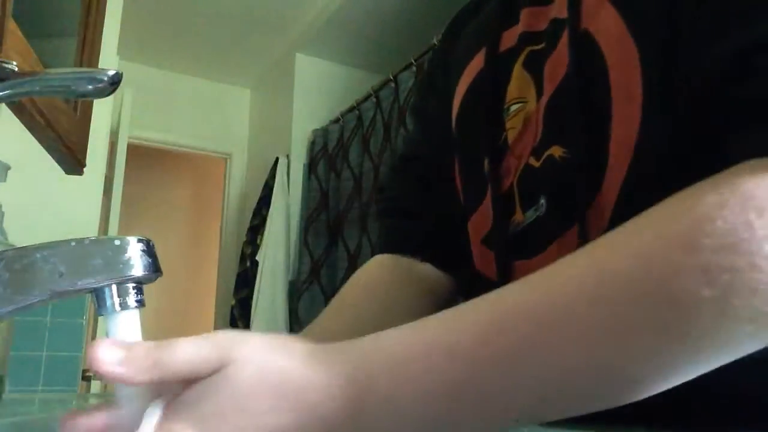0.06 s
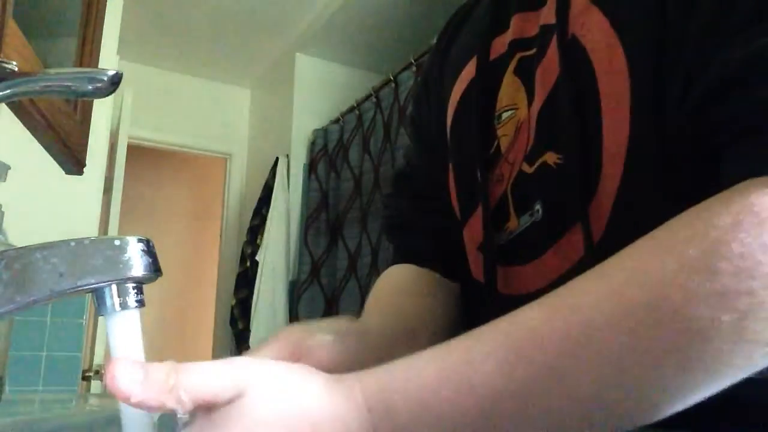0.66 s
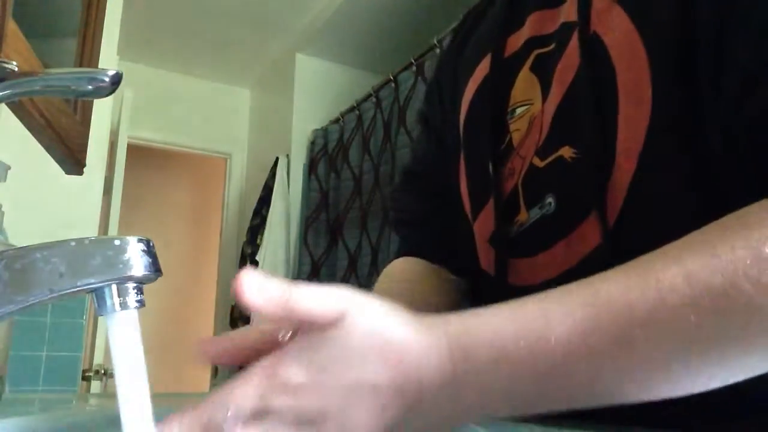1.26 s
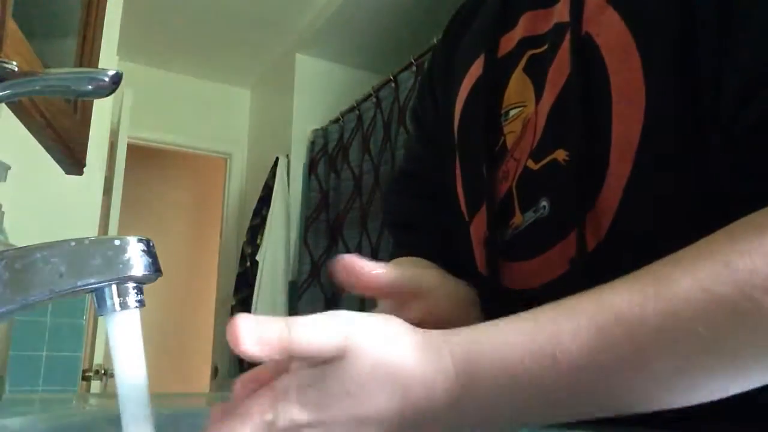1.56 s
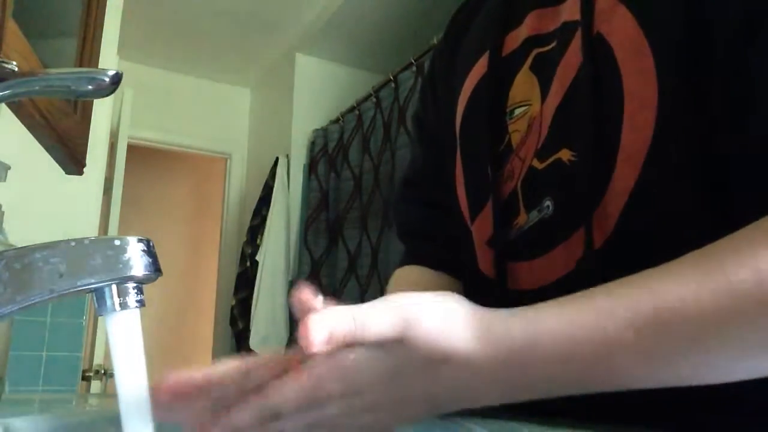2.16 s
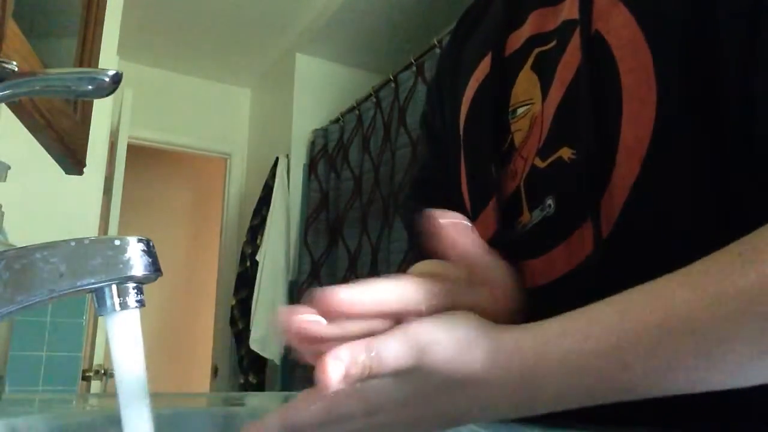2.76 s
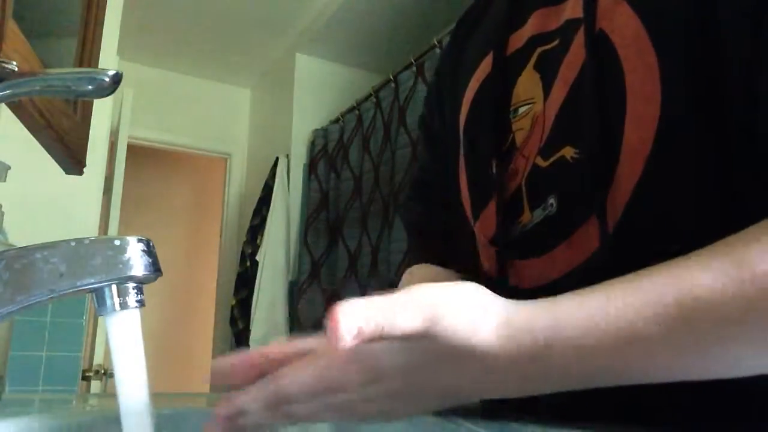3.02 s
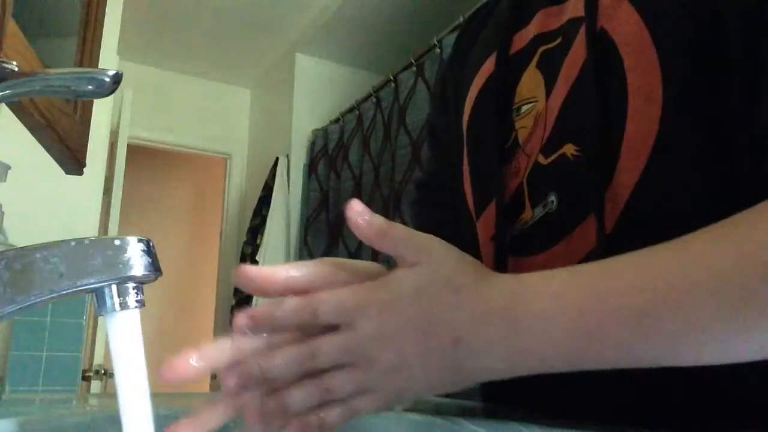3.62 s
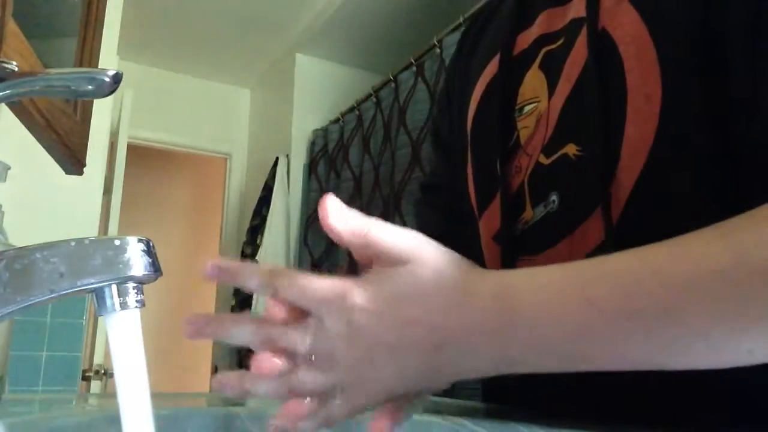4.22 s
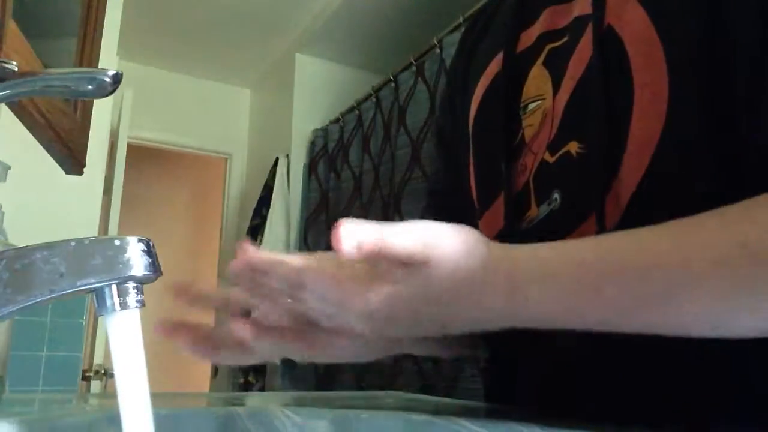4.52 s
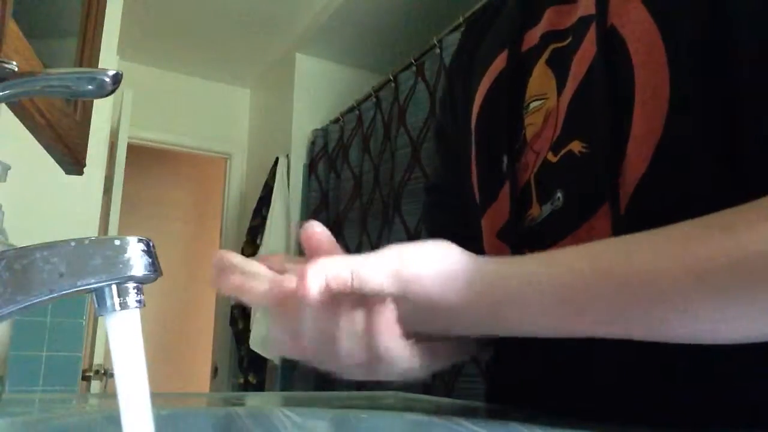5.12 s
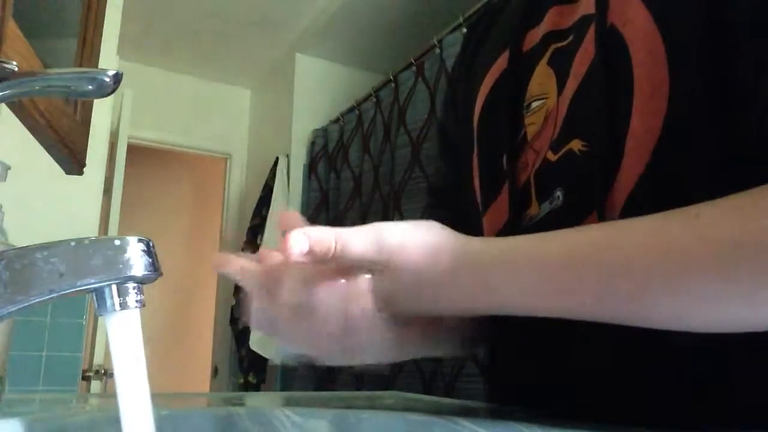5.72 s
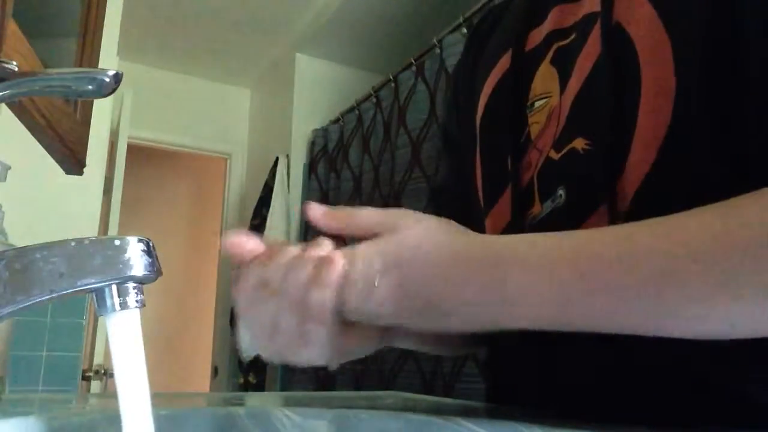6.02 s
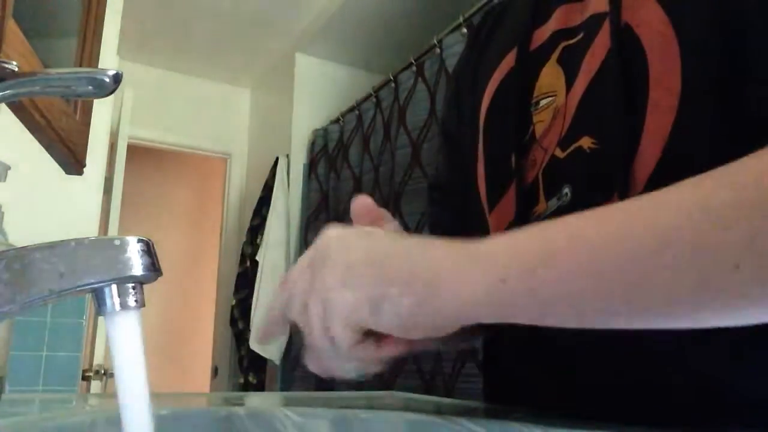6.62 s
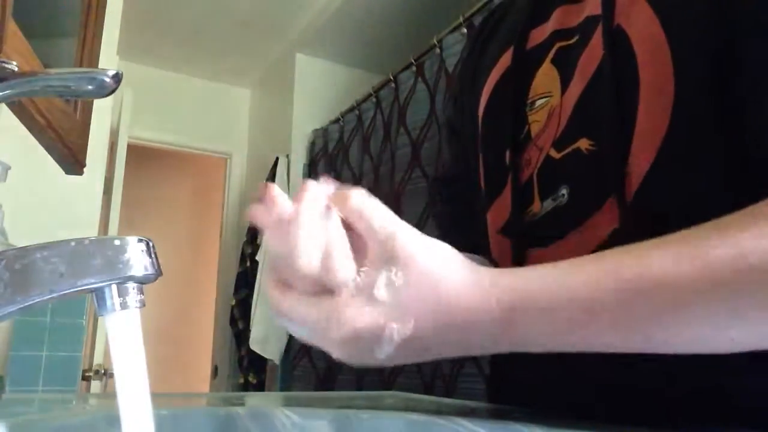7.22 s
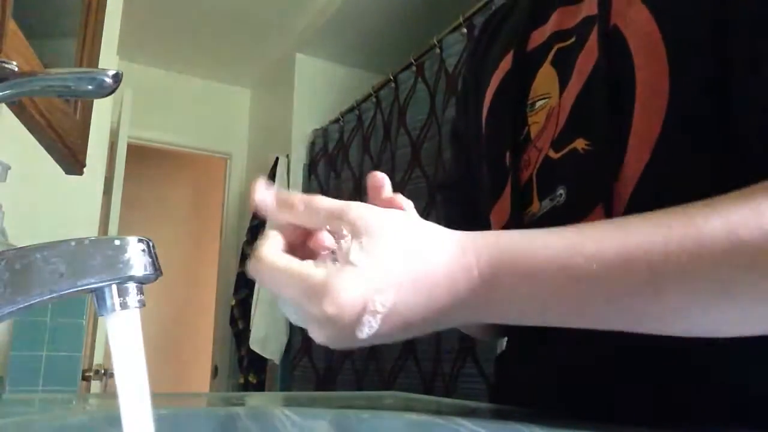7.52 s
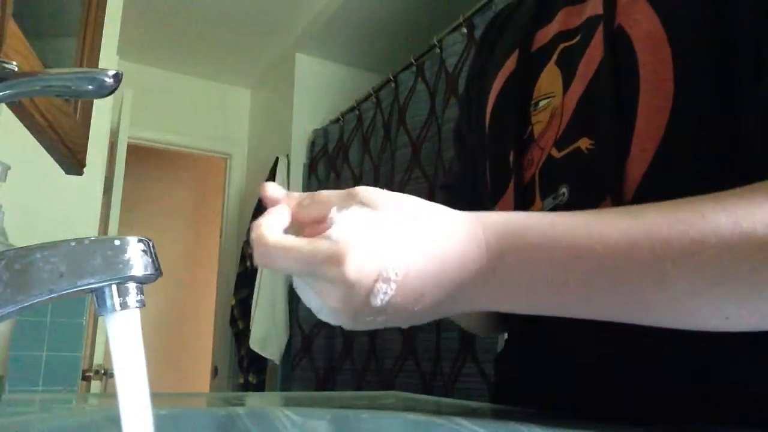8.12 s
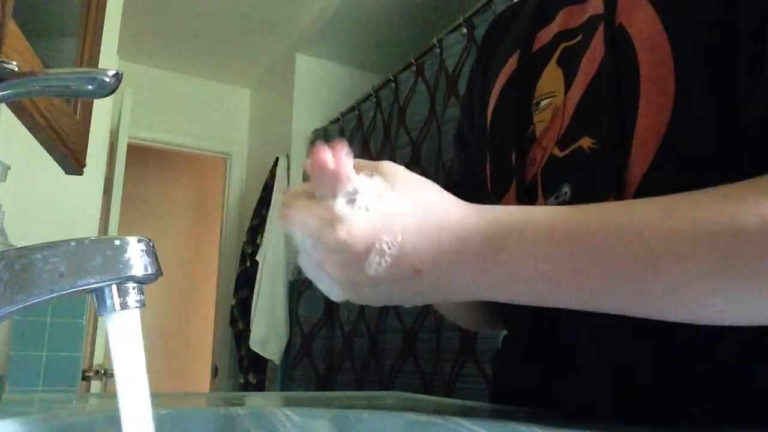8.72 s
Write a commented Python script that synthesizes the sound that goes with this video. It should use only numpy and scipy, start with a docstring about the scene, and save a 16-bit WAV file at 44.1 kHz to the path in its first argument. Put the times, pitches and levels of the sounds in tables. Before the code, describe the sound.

A tap runs steadily into a sink while hands splash briefly, then rub together with soft, soapy squelches.

```python
"""Washing hands under an aerated tap

The tap runs steadily into a basin in a small bathroom, close up and mono. Bursting bubbles make
the jet hiss; its water drums on the basin floor and surges into the pool while the drain gurgles.
At first hands splash through the jet, then they rub soap beside it: soft wet strokes, a growing
crackle of lather and a few squelches of trapped air."""
import sys
import numpy as np
from scipy import signal
from scipy.fft import rfft, irfft, next_fast_len
from scipy.io import wavfile
from scipy.ndimage import map_coordinates

SR = 44100
rng = np.random.default_rng(int(sys.argv[2]) if len(sys.argv) > 2 else 0)


def transcribe(signal):
    """Save signal, clipped to [-1, 1], as a 16-bit WAV file at the path in sys.argv[1]."""
    frames = np.atleast_2d(signal).T
    limited = np.clip(frames, -1, 1)
    pcm = np.round(limited * 32767).astype(np.int16)
    wavfile.write(sys.argv[1], SR, pcm)


N = 395577
TIME = np.arange(N) / SR
FFT_SIZE = next_fast_len(N + SR // 2)
HZ = np.maximum(np.arange(FFT_SIZE // 2 + 1) * SR / FFT_SIZE, 1)


def from_db(db):
    """Decibels to gain."""
    return 10 ** (np.asarray(db) / 20)


def rms_one(x):
    """Scale to unit power."""
    return x / np.sqrt(np.mean(x ** 2) + 1e-20)


def colour(points):
    """An EQ curve through (Hz, dB) points, as a gain at every frequency."""
    hz, db = np.transpose(points)
    return from_db(np.interp(np.log(HZ), np.log(hz), db))


def shaped(x, gain):
    """Play a sound through an EQ curve."""
    return irfft(rfft(x, FFT_SIZE) * gain, FFT_SIZE)[:N]


def drift(turns_per_s):
    """A random wander of unit power."""
    knots = rng.standard_normal(4096)
    return rms_one(np.interp(TIME * turns_per_s, np.arange(len(knots)), knots))


def impacts(per_s, spread_db):
    """Random clicks: many small ones, a few large."""
    sizes = from_db(spread_db * np.minimum(rng.exponential(1, N), 4)) * rng.choice([-1, 1], N)
    return sizes * (rng.random(N) < per_s / SR)


def ring(clicks, hz, t60):
    """Each click sets a sine ringing, dying by 60 dB in t60 seconds."""
    decay, step = from_db(-60 / (t60 * SR)), 2 * np.pi * hz / SR
    return signal.lfilter([0, np.sin(step)], [1, -2 * decay * np.cos(step), decay ** 2], clicks + 1e-18)


def hollow(hz, bursts_per_s, width_hz):
    """Bursting bubbles ring a pocket of air at a steady or moving pitch."""
    carrier = np.exp(2j * np.pi * np.cumsum(np.broadcast_to(hz, N)) / SR)
    damping = signal.butter(2, width_hz / 2, fs=SR, output="sos")
    bursts = impacts(bursts_per_s, spread_db=2.5)
    # shift down, low-pass, shift back: a band that follows the pitch
    return rms_one((signal.sosfilt(damping, bursts / carrier + 1e-18) * carrier).real)


def swells(starts, lengths, levels_db, attack_s, release_s):
    """Gain of a series of attack-hold-release swells; where they overlap the stronger one counts."""
    gain = np.zeros(N)
    for start, length, db in zip(starts, lengths, levels_db):
        rise = (TIME - start) / attack_s
        fall = 1 - (TIME - start - length) / release_s
        gain = np.maximum(gain, from_db(db) * np.clip(np.minimum(rise, fall), 0, 1))
    return gain


def held(starts, values):
    """Each value lasts from its start to the next."""
    return values[np.maximum(np.searchsorted(starts, TIME) - 1, 0)]


# Resonances and notches of basin, drain and spout. Each row: centre in Hz, width in Hz, lift in dB.
BASIN_MODES = [(157, 10.4, 6.5), (225, 17, 5.5), (355, 17.5, 6), (413, 15, 4), (545.6, 20, 7),
               (706, 51, 9.5), (970, 83, 4), (1292, 40, 3.5), (1417, 50, -5), (1482, 22, 6.5),
               (1800, 440, 4), (1880, 26, 2), (2155, 130, -5), (2206, 23, 7), (2350, 206, 4.5),
               (2844, 74, 4), (3350, 270, 4), (4920, 300, 1.5), (5570, 200, 1.6), (6670, 170, 3.5),
               (7120, 150, 2), (7920, 190, 3.5), (11900, 400, 2.5), (12300, 630, -6), (13542, 482, 2),
               (14203, 306, -1), (15100, 300, 5)]
def basin():
    """The bowl's resonances as an EQ curve."""
    return from_db(sum(db / (1 + (2 * (HZ - hz) / width) ** 2) for hz, width, db in BASIN_MODES))


def bathroom(x, t60, wet_db):
    """Direct sound and a short, dense tail from the tiles."""
    t = TIME[:SR // 2]
    tail = rng.standard_normal(len(t)) * from_db(-60 * t / t60) * (t > 0.004)
    return x + from_db(wet_db) * signal.fftconvolve(x, tail / np.linalg.norm(tail))[:N]


# The bright tone of the foaming jet. Each row: frequency in Hz, gain in dB.
FIZZ_EQ = [(300, -20.5), (850, -22.5), (1000, -13), (1800, -10.5), (2100, -9), (2650, -11), (3900, 0),
           (5300, 0.5), (6200, -6), (7500, -0.5), (9300, -4.5), (9700, -6), (12500, -7), (15200, -5.5)]
def jet(level_db, bursts_per_s, flutter_db, patchy_db):
    """Countless tiny bubbles burst; each size of bubble comes in clumps while the whole jet flutters."""
    bursts = impacts(bursts_per_s, spread_db=2.5)
    edges_hz = np.r_[0, np.geomspace(800, 15290, 12)[:-1], SR]
    fizz = np.zeros(N)
    for low, high in zip(edges_hz, edges_hz[1:]):
        fizz += shaped(bursts, (HZ >= low) & (HZ < high)) * from_db(patchy_db * drift(160))
    low_cut = 1 / np.sqrt(1 + (300 / HZ) ** 4)
    fizz = shaped(fizz, colour(FIZZ_EQ) * basin() * low_cut)
    fizz *= from_db(flutter_db * drift(300))
    dip_db = -0.7 * np.clip(1 - TIME, 0, 1)  # hands break the jet for the first second
    return rms_one(bathroom(fizz, t60=0.2, wet_db=-14.5)) * from_db(level_db + dip_db)


def off_the_hands(x, lag_s, sway, echo_db):
    """The moving hands throw back a faint, very early echo, so the hiss shifts a little in colour."""
    lag = lag_s * np.exp(sway * drift(2.7))
    return x + from_db(echo_db) * map_coordinates(x, [(TIME - lag) * SR], order=3)


# The low thrum of the basin floor. Each row: frequency in Hz, gain in dB.
FLOOR_EQ = [(25, -31), (35, -32), (50, -15.5), (70, -13.5), (100, 0), (230, -2.0), (400, -4.5), (500, -15),
            (900, -15)]
def drumming(blows_per_s, lump_db, top_hz):
    """Lumps of water beat on the basin floor and shake its low modes."""
    blows = impacts(blows_per_s, spread_db=2.0) * from_db(lump_db * drift(25))
    high_cut = 1 / np.sqrt(1 + (HZ / top_hz) ** 8)
    return rms_one(shaped(blows, colour(FLOOR_EQ) * basin() * high_cut))


# The tone of the splashes. Each row: frequency in Hz, gain in dB.
SPLASH_EQ = [(200, -20), (450, -1.5), (1000, 3), (1800, 3), (2600, 0), (3350, 12), (5000, -8), (12000, -22)]
# Water breaks over the hands. Each row: start in seconds, length in seconds, level in dB.
HAND_RINSES = [(0, .3, -54), (0.288, 0.25, -44), (1.08, 0.15, -46)]
def splashing(ring_cycles):
    """Drops land and trap ringing bubbles: thickly in a rinse, thinly from the growing lather."""
    rinse = swells(*np.transpose(HAND_RINSES), attack_s=0.04, release_s=0.14)
    lather = from_db(-48 - 2 * np.maximum(8.4 - TIME, 0))  # grows until the hands are covered at 8.4 s
    drops_per_s = np.where(rinse > lather, 400, 160)
    drops = impacts(drops_per_s, spread_db=2.0) / np.sqrt(drops_per_s)
    pitches_hz = np.geomspace(400, 9000, 36)
    pick = rng.integers(0, len(pitches_hz), N)
    bubbles = sum(hz * ring(drops * (pick == k), hz, ring_cycles / hz) for k, hz in enumerate(pitches_hz))
    return rms_one(shaped(bubbles, colour(SPLASH_EQ))) * np.hypot(rinse, lather)


# The gurgle's rise and fall. Each row: time in seconds, level in dB.
DRAIN_LEVELS = [(.2, -46.5), (.45, -53.5), (2.6, -48.5), (4.4, -50), (5.9, -53), (6.8, -54), (7.3, -47.5),
                (8, -55), (8.97, -50)]
def drain():
    """The drain's throat gurgles on one pitch."""
    level_db = np.interp(TIME, *np.transpose(DRAIN_LEVELS))
    return hollow(hz=1782, bursts_per_s=2000, width_hz=58) * from_db(level_db)


# The jet digs into the pool. Each row: start in seconds, length in seconds, cavity level in dB,
# cavity pitch in Hz, floor thrum level in dB.
POOL_SURGES = [(0.246, 0.3, -51, 244, -65), (0.776, .16, -42.5, 224, -46.5), (.97, 0.12, -52, 233, -45),
               (1.38, 0.19, -42, 240, -47.5), (1.754, 0.53, -46.5, 222, -54), (2.28, 0.7, -48, 170, -52),
               (3.024, 0.42, -49, 229, -49.5), (3.496, 0.14, -49, 158, -50.5), (4.7, .24, -55, 225, -52),
               (4.997, 0.38, -53, 174, -51), (5.548, .23, -63, 165, -49), (6.095, 0.4, -54, 167, -49.5),
               (8.08, 0.27, -50, 217, -49), (8.497, .47, -48.5, 221, -48.5)]
def surges(attack_s, release_s):
    """Each surge digs a booming cavity in the pooled water and thumps the floor under it."""
    starts, lengths, cavity_db, cavity_hz, thrum_db = np.transpose(POOL_SURGES)
    cavity = hollow(held(starts, cavity_hz), bursts_per_s=3000, width_hz=59)
    cavity *= swells(starts, lengths, cavity_db, attack_s, release_s)
    thrum = drumming(blows_per_s=2000, lump_db=1.5, top_hz=180)
    thrum *= swells(starts, lengths, thrum_db, attack_s, release_s)
    return cavity + thrum


# Air pockets pop between wet hands. Each row: start in seconds, pop level in dB, pitch in Hz,
# time to fade by 60 dB in seconds, splat level in dB.
AIR_POCKETS = [(.412, -44, 1050, .04, -41), (.517, -45, 880, 0.045, -38), (.622, -33, 1880, .07, -50),
               (.642, -29.5, 1910, 0.028, -31), (.646, -33, 1575, 0.07, -40),
               (1.164, -33, 1800, 0.038, -45), (2.566, -30, 1740, 0.045, -43), (2.844, -32, 2150, .03, -44),
               (3.238, -33, 2750, .008, -28), (5.439, -31, 1780, .045, -45), (6.422, -38, 1250, .03, -44),
               (6.424, -33, 2220, .04, -38), (7.359, -24, 2880, 0.021, -44)]
def squelches(rise_per_s, attack_s, splat_t60):
    """The water film splats, and the air pocket rings briefly, rising a little in pitch as it opens."""
    out = np.zeros(N)
    for start_s, pop_db, hz, t60, splat_db in AIR_POCKETS:
        start = round(start_s * SR)
        t = TIME[:min(SR // 5, N - start)]
        pop = np.sin(2 * np.pi * hz * (t + rise_per_s * t ** 2 / 2)) * from_db(pop_db - 60 * t / t60)
        film_band = signal.butter(2, [hz * 0.69, hz * 1.45], "band", fs=SR, output="sos")
        splat = rms_one(signal.sosfilt(film_band, rng.standard_normal(len(t))))
        splat *= from_db(splat_db - 60 * t / splat_t60)
        out[start:start + len(t)] += (pop + splat) * (1 - np.exp(-t / attack_s))
    return out


# Soapy palms slide. Each row: start in seconds, length in seconds, level in dB, hollow's pitch in Hz.
PALM_STROKES = [(2.22, 0.15, -48, 2350), (4.42, 0.26, -48, 2680), (4.72, 0.22, -51, 2600),
                (5.1, 0.18, -48, 2770), (5.283, 0.41, -47.5, 2360), (5.66, 0.15, -48, 2420),
                (5.855, 0.3, -48, 2360), (6.78, 0.23, -51, 2720), (7.18, 0.2, -50, 2800),
                (7.58, .2, -52, 2750), (7.9, .3, -54, 2750), (8.418, .2, -50, 2580), (8.75, .22, -52, 2730)]
def rubbing():
    """Each stroke crushes foam in the hollow between the palms."""
    starts, lengths, levels_db, palm_hz = np.transpose(PALM_STROKES)
    foam = hollow(held(starts, palm_hz), bursts_per_s=500, width_hz=340)
    return foam * swells(starts, lengths, levels_db, attack_s=0.051, release_s=0.18)


def scene():
    """Water in the basin and hands above it, the same in both channels."""
    fizz = jet(level_db=-27.94, bursts_per_s=26000, flutter_db=0.29, patchy_db=0.75)
    water = off_the_hands(fizz, lag_s=0.000693, sway=0.17, echo_db=-20.5)
    water += from_db(-46.5) * drumming(blows_per_s=5000, lump_db=1.06, top_hz=900)
    water += surges(attack_s=0.048, release_s=0.077) + drain()
    hands = splashing(ring_cycles=21) + rubbing()
    hands += squelches(rise_per_s=0.84, attack_s=0.00027, splat_t60=0.029)
    return np.tile(water + bathroom(hands, t60=0.11, wet_db=-7), (2, 1))


def record(dry):
    """A steep high cut takes off the very top."""
    top_hz = 15290
    high_cut = 1 / np.sqrt(1 + np.minimum(HZ / top_hz, 1.2) ** 600)
    return np.array([shaped(side, high_cut) for side in dry])


dry = scene()
out = record(dry)
transcribe(out)
```